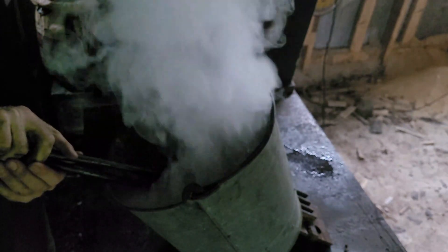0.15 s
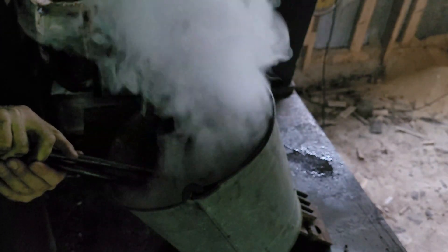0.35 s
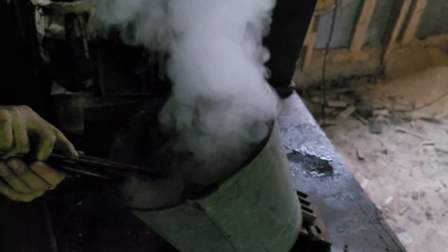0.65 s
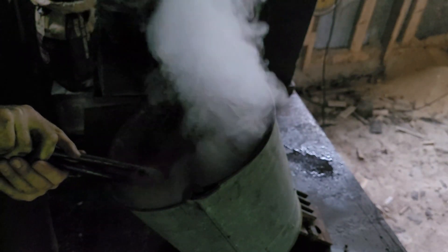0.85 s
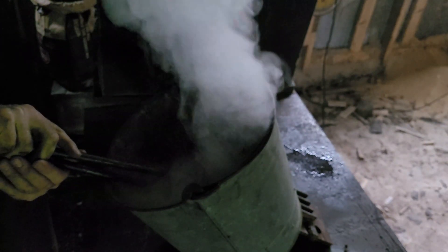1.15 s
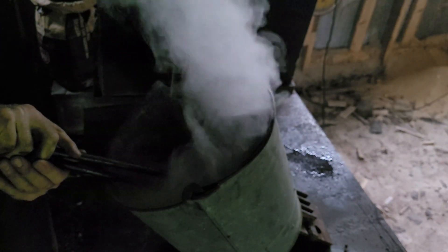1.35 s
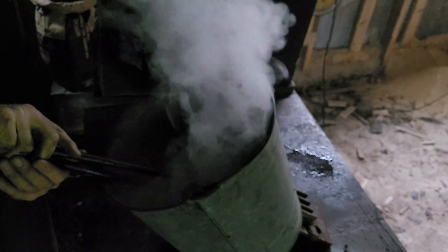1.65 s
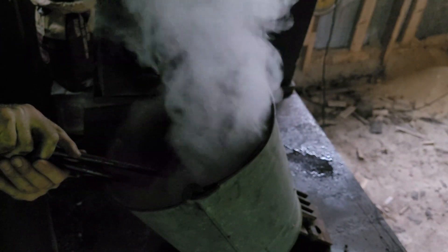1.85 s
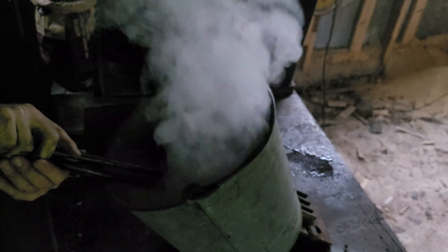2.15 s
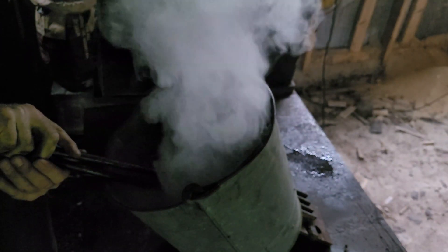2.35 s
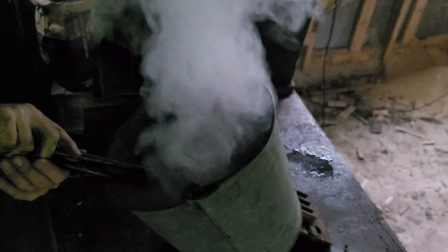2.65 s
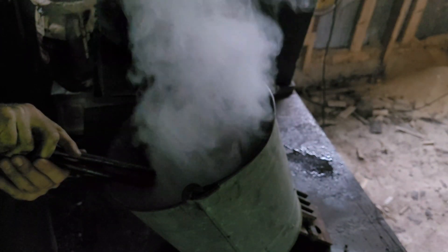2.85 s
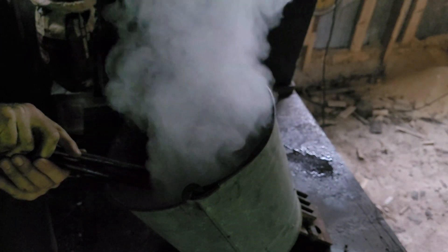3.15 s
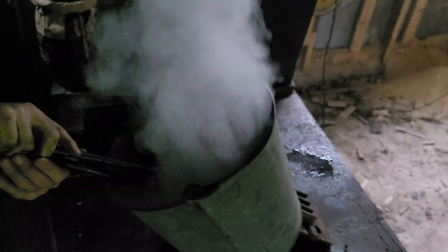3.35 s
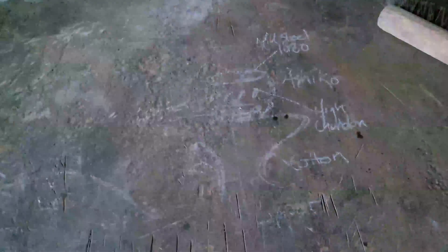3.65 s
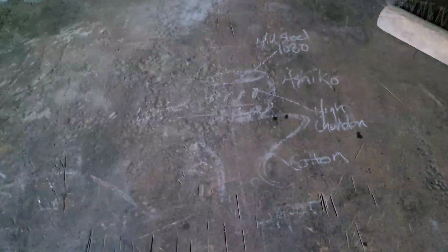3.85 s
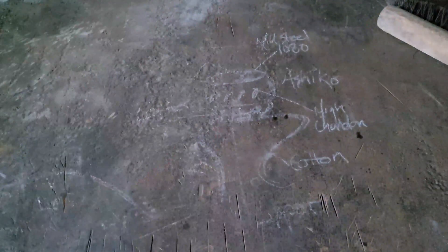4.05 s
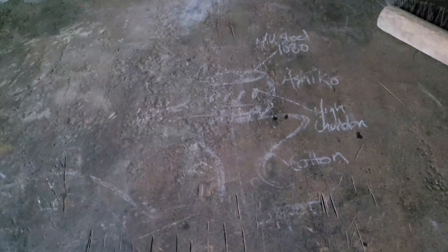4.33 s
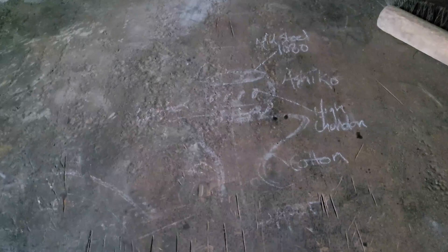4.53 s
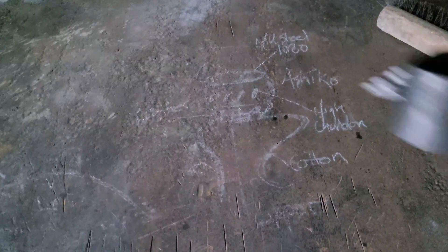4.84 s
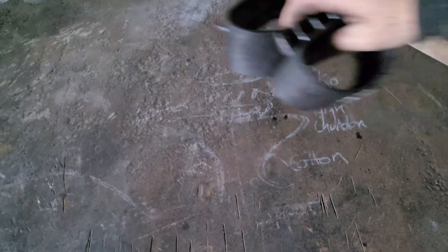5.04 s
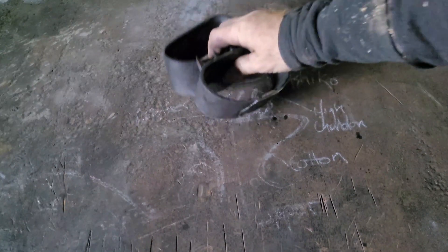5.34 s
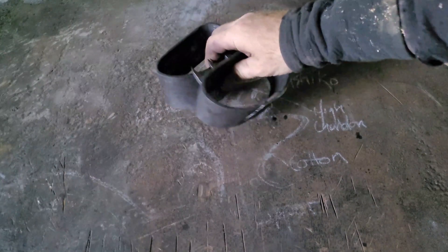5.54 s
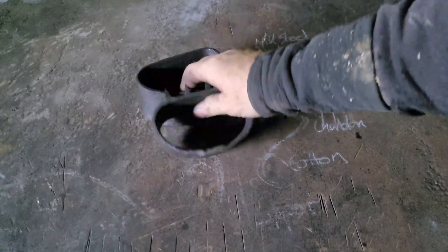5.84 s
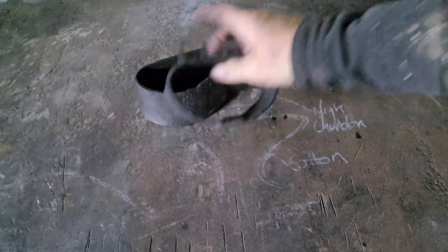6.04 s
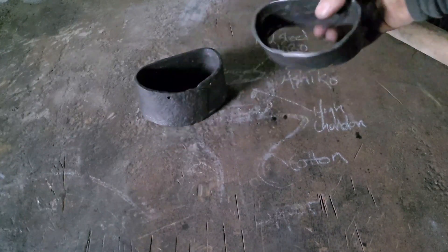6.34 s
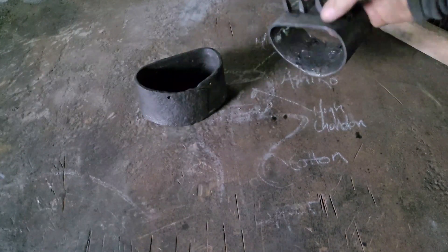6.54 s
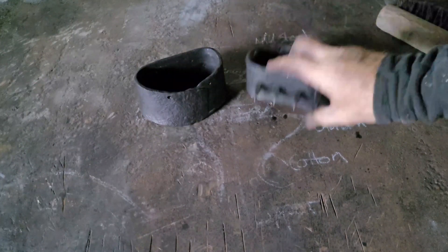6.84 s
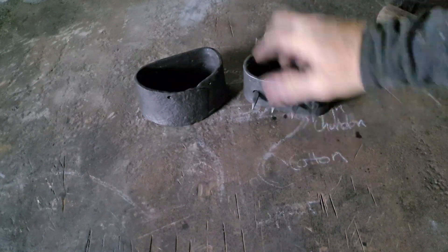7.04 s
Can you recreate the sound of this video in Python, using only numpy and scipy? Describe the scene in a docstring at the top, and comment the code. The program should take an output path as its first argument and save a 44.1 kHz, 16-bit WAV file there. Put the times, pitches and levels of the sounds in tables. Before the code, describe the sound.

Oil crackles and fizzes around hot metal, with hollow bucket resonance and snapping spits slightly left of centre. After a hard cut, near quiet: faint mains ticking, hiss and a thin rising whine. Light metallic clinks and a brief scrape follow, then heavy short-ringing knocks of bands on a bench, a pause, and a final hard set-down. Close stereo microphones, small dry shop reverberation.

```python
"""Hot steel in oil, then bands on a bench

Hot steel sizzles in a bucket of oil: dense random bursts make the seethe, pitched pops and noisy spits
stand out of it. After a cut, two steel bands clink, scrape and are set down on a wooden bench: knocks and
rubs drive the ringing modes of all three, and feedback delays give the shop's reverberation.
Filtered noise makes the air that rocks the microphones; a ticking mains buzz, steady tones,
a thin gliding whine and hiss lie under everything.
"""
import sys
import numpy as np
from scipy import signal
from scipy.fft import rfft, irfft, next_fast_len
from scipy.io import wavfile
from scipy.ndimage import uniform_filter1d

SR = 44100
rng = np.random.default_rng(int(sys.argv[2]) if len(sys.argv) > 2 else 0)


def transcribe(u):
    """Save the signal u as a 16-bit wav file named by the first command-line argument.

    u: samples, shape (n,) or (channels, n), limited to [-1, 1]; the rate is SR.
    q: integer samples, one column per channel.
    """
    v = np.clip(np.atleast_2d(u).T, -1, 1)
    q = np.round(v * 32767).astype(np.int16)
    wavfile.write(sys.argv[1], SR, q)


N = 316969
T = np.arange(N) / SR   # time in seconds

# Loudness of the seething oil. Each row: time in seconds, level in dB.
SEETHE_LEVEL = [(0, -45), (1.25, -43.5), (1.8, -44.5), (2.3, -43), (2.95, -45), (3.39, -44.5),
                (3.52, -44.5), (3.58, -55)]
# Colour of the seething. Each row: frequency in Hz, relative level in dB per Hz.
SEETHE_COLOUR = [(120, -42), (200, -20), (403, -1), (630, -8.5), (738, -7), (1060, -12), (1350, -7.5),
                 (2010, -8.5), (3300, -9), (5410, -14), (5850, -18.5), (9000, -27), (11700, -47),
                 (19800, -120)]
# Hollow notes of the bucket. Each row: frequency in Hz, width in Hz, level against the seethe in dB.
BUCKET_NOTES = [(1418, 35, -15.5), (312, 75, -11.5), (428, 41, -25.5)]
# Big bubbles. Each row: start in seconds, level in dB, pitch in Hz.
BIG_BUBBLES = [(0.1102, -31.5, 4840), (0.2448, -34.5, 3030), (0.3621, -37, 3250), (0.5172, -36, 2870),
               (0.7731, -32, 3500), (0.846, -33, 3230), (1.015, -37, 1690), (1.257, -40, 1390),
               (1.4506, -42, 1310), (2.1625, -39, 3630), (2.348, -35.5, 2470), (2.9841, -40, 3260),
               (3.5029, -40, 2550)]
# Oil spits at set times, most of them loud. Each row: start in seconds, peak level before panning in dB,
# centre in Hz.
TIMED_SPITS = [(0.112, -18, 11600), (0.2447, -17.5, 14100), (0.3626, -20, 9250), (0.4105, -25, 9130),
               (0.463, -21.5, 9360), (0.5906, -30, 13600), (0.6636, -24, 13200), (0.7607, -16, 13100),
               (0.8005, -16, 13800), (0.8789, -25.5, 14300), (1.1833, -25, 7800), (1.2513, -22, 9810),
               (1.3713, -21, 8340), (1.454, -28, 13300), (1.5683, -27.5, 14300), (1.951, -26, 14200),
               (2.2041, -21.5, 14000), (2.4284, -28, 6440), (2.7625, -18, 14000), (2.8953, -45, 13100),
               (3.0729, -28, 6650), (3.1715, -27, 14400), (3.3737, -23, 11800)]
# Bands knocked. Each row: start in seconds, first band, second band and bench level in dB,
# hardness in dB per octave, left minus right in dB.
BAND_KNOCKS = [(4.473, -50, -51, -42, 3, 3), (4.541, -35.5, -50, -50, 3.5, -1),
               (4.693, -33, -79, -65, 1, -16), (4.706, -21.5, -47, -34.5, 0.5, -19),
               (4.72, -20.5, -57, -47, 4, -14), (4.739, -27.5, -45, -50, 11, -19),
               (4.754, -45, -55, -50, 2, 1), (5.197, -42, -61, -68, 10, -1), (5.279, -61, -67, -64, -5, -3),
               (5.442, -36, -60, -64, 4, 1), (5.704, -51, -57, -58, 3, 5),
               (5.735, -34, -10.5, -23.5, -6.5, -2.5), (5.795, -18, -8.5, -5, 1, -5.5),
               (5.868, -24.5, -21, -21, -5, -1), (6.026, -59, -50, -61, -2, 0),
               (6.473, -49, -34.5, -41, -4.5, 1), (6.534, -41, -32, -56, 13, 0),
               (6.778, -10.5, -18, -25.5, -6.5, 1.5), (6.86, -13, -33, -15, 5.5, 8.5),
               (6.875, -22, -32, -7, 8.5, 12), (6.895, -13.5, -14.5, -18.5, -1, 5)]
# Bands rubbed. Each row: start in seconds, length in seconds, first band, second band and bench level in dB,
# hardness in dB per octave.
BAND_SCRAPES = [(4.67, 0.059, -46, -40, -52, 10), (5.428, 0.091, -48.5, -70, -64, 1),
                (6.464, .165, -60.5, -52.5, -54, -0.5)]
# Ringing modes of the two bands, left free, and of the bench.
# Each row: frequency in Hz, relative level in dB, 60 dB decay time in seconds.
FIRST_BAND_MODES = [(1523, 7, 0.21), (1700, -1, 0.04), (1850, -8, 0.06), (2046, -2, 0.06), (2345, -5, 0.08),
                    (2570, 1, 0.07), (2760, -10, 0.12), (3200, -10, 0.06), (3550, 0, 0.04), (3725, 2, 0.05),
                    (3960, -3, 0.05), (4350, -10, 0.05), (4975, 0, 0.055), (6970, -17, 0.02)]
SECOND_BAND_MODES = [(1135, -3, 0.099), (1308, 1, 0.057), (1374, 4, 0.048), (1440, -9, .15),
                     (2030, -1.5, 0.071), (2151, 4.5, 0.049), (2340, -33, 0.15), (2420, -2.5, 0.1),
                     (2770, -14, 0.076), (3460, -37, 0.043), (4140, -9, 0.069), (5500, -39, 0.11)]
BENCH_MODES = [(125, -31, 0.16), (268.7, -18.5, 0.22), (328.5, -9.5, 0.11), (417, -42, 0.17),
               (512, 0.5, 0.069), (611, -5.5, 0.077), (657, -11, 0.21), (769, 1.5, 0.11),
               (821, -6.5, 0.052), (930, 5, 0.04)]
# Slow air pressure. Each row: time in seconds, level in dB.
SWELL_LEVEL = [(0, -35), (1.2, -35), (1.35, -18), (1.7, -17), (1.9, -22), (2.4, -18), (2.55, -30),
               (3.5, -29), (4.3, -33), (4.6, -28), (5.2, -35), (5.75, -33), (6.05, -23), (6.25, -30),
               (6.45, -24), (7, -24), (7.19, -29)]
# Puffs of air on the microphones. Each row: centre in seconds, level in dB.
AIR_PUFFS = [(1.44, -29), (1.55, -29.5), (1.74, -28), (2.1, -32), (2.381, -17), (2.65, -31), (2.9, -39),
             (3.14, -36.5), (4.12, -61), (4.46, -31.5), (4.98, -30), (5.16, -40), (6.12, -24), (7.19, -36)]
# Steady tones. Each row: frequency in Hz, rms level in dB.
STEADY_TONES = [(60.014, -52.5), (180.04, -69), (7500, -70.5), (9990, -69.5)]
# Wandering whine before the cut. Each row: time in seconds, pitch in Hz, level in dB.
WHINE_GLIDE = [(0, 5560, -58), (.4, 5340, -58), (.95, 5500, -58), (1.3, 5285, -58), (1.7, 5120, -59),
               (2.1, 5070, -60), (2.6, 5050, -63), (2.9, 5050, -80)]
# What the climbing whine still lacks, dying away. Each row: gap in Hz, time constant in seconds.
WHINE_RISE_GAPS = [(500, .07), (2170, .5)]
# The whine and two lines below it, a buzz rate apart. Each entry: level against the whine's gain in dB.
WHINE_LINES = [-1, -3.5, -5]
# Colour of the hiss. Each row: frequency in Hz, relative level in dB per Hz.
HISS_COLOUR = [(35, 1), (65, 12), (125, 7.5), (250, 4.5), (510, 1.5), (1000, -3.5), (2000, -5.5),
               (4000, -8.5), (8000, -10.5), (15500, -12.5)]

FIZZ_DB, FIZZ_FADE_DB_PER_S = -47.5, 1.5   # the treble fizz thins as the steel cools
SMALL_SPITS, SMALL_SPIT_HZ = 18, (6200, 14400)   # at random moments, centred in this range
SMALL_SPIT_DB, SMALL_SPIT_RANGE_DB = -36, 9   # middle level, and the most above or below it
SPIT_PAN_DB, SPIT_PAN_SPREAD_DB = 2.5, 8.5   # left minus right
RUB_ATTACK_S, RUB_RELEASE_S, RUB_EDGE_DB = 0.034, 0.043, -33   # a rub swells from and sinks to its edge level
MODE_LAG_CYCLES = (0.15, 0.3)   # each mode reaches one microphone this much after the other
SET_DOWN_S = 5.72   # until then the hand grips both bands
GRIP_SHARE = 0.45   # of the free ring time that the grip leaves
KNOCK_MODE_DB, RUB_MODE_DB, CRACK_DB = -11.5, -1.5, -14   # knock to mode, rub to mode, knock to crack
KNOCK_SCATTER_DB = 1.8   # random spread of each knock in each mode
SHOP_T60_S, SHOP_WALL_CUT_HZ, SHOP_DB = 0.28, 7800, -13
RUMBLE_DB = -23.5   # added to the swell level
LUMPS_DB, LUMPS_PER_S = -0.5, 5.6   # depth and rate of the rumble's lumps
PUFF_HALF_WIDTH_S = 0.03
BUZZ_HZ, BUZZ_START_S, BUZZ_DB = 120.028, 0.00565, -27.5   # ticks per second, first tick, tick level
RISE_START_S, RISE_TOP_HZ = 3.62, 5785   # after the cut the whine climbs and settles
RISE_DB, FADE_IN_DB, FADE_IN_S = -57, -10, 0.12   # settled level, starting deficit, time constant
THROB_LAG = 0.22   # share of a buzz cycle after the tick
HISS_DB = -50
TREBLE_STEP_HZ, TOP_CUT_HZ = 14900, 16345


def quench():
    """Vapour bubbles burst all over the oil: a wide seething, short pops, hollow bucket notes, treble fizz."""
    seethe_db, on = in_time(SEETHE_LEVEL)
    shared, *sides = grains(9000, spread_db=3.5, channels=3)
    bursts = 0.5 * shared + np.array(sides)
    seethe = coloured(bursts, SEETHE_COLOUR)
    for hz, width_hz, db in BUCKET_NOTES:
        seethe = seethe + from_db(db) * rms_one(ring(bursts, hz, 2.4 / width_hz))

    # each pop is dealt one of twelve pitches
    births = grains(220, spread_db=2.5)
    pitch_index = rng.integers(0, 12, N)
    pops = np.zeros((2, N))
    for k, hz in enumerate(np.geomspace(1000, 5200, 12)):
        pops += ring(births * (pitch_index == k), hz, 23.0 / hz)
    seethe = close_pair(seethe + from_db(-11) * rms_one(pops), alike_hz=525)

    # the fizz is a smooth hiss with sparse crackles on top
    crackles = rms_one(grains(400 * from_db(4 * drift(15)), spread_db=5.0))
    fizz = rng.standard_normal((2, N)) + 1.2 * crackles
    fizz = coloured(fizz, [(3500, -8), (6500, 1), (11000, 2), (14000, 7), (16000, 2)])
    fizz_gain = from_db(FIZZ_DB - FIZZ_FADE_DB_PER_S * T)

    flicker = from_db(1.6 * drift(14))
    mix = from_db(seethe_db) * flicker * seethe + fizz_gain * fizz
    return on * mix * from_db([[1.1], [-1.1]])   # slightly to the left


def big_pops():
    """Each big bubble rings briefly at its own pitch."""
    out = np.zeros(N)
    for start, db, hz in BIG_BUBBLES:
        click = np.zeros(2000)
        click[0] = from_db(db)
        out[round(start * SR):][:2000] += ring(click, hz, 60.0 / hz)
    return out * from_db([[1.5], [-1.5]])


def spits():
    """Each spit is a noise snap of about a millisecond with a weaker, longer spray behind it."""
    length = 900
    t = np.arange(length) / SR
    envelope = np.exp(-t / 0.00044) + 0.2 * np.exp(-t / 0.008)

    when, size, pitch = rng.random((SMALL_SPITS, 3)).T
    small_s = when * SEETHE_LEVEL[-2][0]   # none once the seethe starts its final drop
    small_db = SMALL_SPIT_DB + SMALL_SPIT_RANGE_DB * (2 * size - 1)
    small_hz = np.interp(pitch, [0, 1], SMALL_SPIT_HZ)

    out = np.zeros((2, N + length))
    for start, db, hz in [*TIMED_SPITS, *zip(small_s, small_db, small_hz)]:
        noise = rng.standard_normal((2, length))
        pan = rng.normal(SPIT_PAN_DB, SPIT_PAN_SPREAD_DB)
        band = signal.butter(1, [0.55 * hz, min(2.16 * hz, 0.45 * SR)], "band", fs=SR)
        puff = signal.lfilter(*band, noise * envelope)
        gain = from_db(db + np.array([[pan], [-pan]]) / 2)
        at = round(start * SR)
        out[:, at:at + length] += puff / np.abs(puff).max() * gain
    return out[:, :N]


def bands():
    """Knocks are one main contact with a short chatter behind it, scrapes dense small contacts; both ring modes."""
    start, *blows_db, hard_db, pan = np.transpose(BAND_KNOCKS)
    at = (start * SR).astype(int)
    # every knock chatters: six further contacts, mostly weaker, follow within some ms
    lags_s = rng.exponential(0.012, (len(at), 6))
    chatter_at = at[:, None] + 1 + (lags_s * SR).astype(int)
    chatter = 0.6 * np.exp(-lags_s / 0.016)
    rubs = [(*levels, rub(begin, length)) for begin, length, *levels in BAND_SCRAPES]
    held = T < SET_DOWN_S

    out, crack = np.zeros((2, N)), np.zeros(N)
    for body, modes in enumerate([FIRST_BAND_MODES, SECOND_BAND_MODES, BENCH_MODES]):
        held_share = 1 if modes is BENCH_MODES else GRIP_SHARE
        for hz, mode_db, t60 in modes:
            octaves = np.log2(hz / 2000)   # a hard contact favours the high modes
            force = np.zeros((2, N))
            knock_db = blows_db[body] + mode_db + KNOCK_MODE_DB + hard_db * octaves
            knock_db = knock_db + KNOCK_SCATTER_DB * rng.standard_normal((2, len(at)))
            force[:, at] = from_db(knock_db) * from_db([pan / 2, -pan / 2]) * rng.choice([-1, 1])
            force[:, chatter_at] += force[:, at, None] * chatter * rng.standard_normal(chatter.shape)

            for *levels, rub_hard_db, stroke in rubs:
                busy = stroke > 0
                count = busy.sum()
                grit = rng.standard_normal((2, count)) * (rng.random(count) < 900 / SR)
                rub_db = levels[body] + mode_db + RUB_MODE_DB + rub_hard_db * octaves
                force[:, busy] += grit * stroke[busy] * from_db(rub_db)

            # contacts before the set-down ring in the grip, later ones freely
            left, right = ring(force * held, hz, t60 * held_share) + ring(force * ~held, hz, t60)
            lag_cycles = rng.uniform(*MODE_LAG_CYCLES) * rng.choice([-1, 1])
            out += [left, np.roll(right, round(lag_cycles * SR / hz))]
        crack[at] += from_db(blows_db[body] + hard_db + CRACK_DB)
    out = signal.sosfilt(signal.butter(2, 6300, fs=SR, output="sos"), out)   # no contact is perfectly sharp
    return out + contact_noise(crack, rubs)


def rub(start, length):
    """Gain of one stroke: attack, hold, release."""
    end = start + length
    db, on = in_time([(start, RUB_EDGE_DB), (start + RUB_ATTACK_S, 0),
                      (end, 0), (end + RUB_RELEASE_S, RUB_EDGE_DB)])
    return on * from_db(db)


def contact_noise(crack, rubs):
    """Each knock's crack is noise that dies within tens of ms; each rub adds broad grit."""
    crack = signal.lfilter([1], [1, -np.exp(-1 / (0.011 * SR))], crack + 1e-18)
    crack_noise = coloured(rng.standard_normal((2, N)), [(100, 2), (400, 14.5), (2500, 17.5), (5500, 0.5),
                                                         (8000, -14), (15000, -22)])
    # grit follows the first band's rub level
    grit = sum(stroke * from_db(first + 2 * hard_db - 1.5) for first, _, _, hard_db, stroke in rubs)
    sand = coloured(grains(3800, spread_db=5.0), [(200, 2), (1500, 1), (5000, 2), (8000, -4.5), (15000, -8)])
    return crack * crack_noise + grit * sand


def shop(x):
    """Room reverberation: eight feedback delays a side, duller on every round."""
    size = next_fast_len(N + SR)
    w = 2 * np.pi * np.arange(size // 2 + 1) / size
    dull = 1 / (1 + 1j * w * SR / (2 * np.pi * SHOP_WALL_CUT_HZ))
    spectrum = rfft(x, size)
    out = []
    for lags_s in rng.uniform(0.012, 0.04, (2, 8)):
        response = 0
        for k, lag in enumerate(lags_s):
            trip = from_db(-60 * lag / SHOP_T60_S) * dull * np.exp(-1j * w * round(lag * SR))
            response = response + (-1) ** k * trip / (1 - trip)   # endless rounds; every other delay inverted
        out.append(irfft(spectrum * response, size)[:N])
    return np.array(out)


def air():
    """Slow pressure swells and a lumpy rumble with single puffs, the same in both channels."""
    swell = coloured(rng.standard_normal(N), [(0.5, -20), (1.5, 0), (10, -2), (16, -16), (30, -36), (200, -110)])
    rumble = coloured(rng.standard_normal(N), [(10, -4.5), (18, 13), (40, -3.0), (100, -15.5), (200, -40),
                                               (600, -60), (1000, -100)])
    swell_db = in_time(SWELL_LEVEL)[0]
    rumble_gain = from_db(swell_db + RUMBLE_DB + LUMPS_DB * drift(LUMPS_PER_S))
    puffs = sum(from_db(db) * np.exp(-((T - s) / PUFF_HALF_WIDTH_S) ** 2) for s, db in AIR_PUFFS)
    return from_db(swell_db) * swell + (rumble_gain + puffs) * rumble


def mains():
    """A sharp tick twice per mains cycle, up and down in turn, steady tones, a throbbing whine, and hiss."""
    cycle = (T - BUZZ_START_S) * BUZZ_HZ
    ticks = np.diff(np.floor(cycle), prepend=-1.) * -(-1) ** np.floor(cycle)
    out = from_db(BUZZ_DB) * signal.lfilter([1, -1], [1, -0.7], ticks)
    for hz, db in STEADY_TONES:
        out += np.sqrt(2) * from_db(db) * np.sin(2 * np.pi * hz * T)
    # lines a buzz rate apart beat together, so the whine throbs with the ticks
    whine_hz, whine_gain = whine()
    whine_cycles = np.cumsum(whine_hz) / SR
    for k, db in enumerate(WHINE_LINES):
        out += whine_gain * from_db(db) * np.sin(2 * np.pi * (whine_cycles - k * (cycle - THROB_LAG)))
    return out + hiss()


def whine():
    """Pitch in Hz and gain of the thin whine: a wandering glide, then a climb that settles."""
    hz, db, on = in_time(WHINE_GLIDE)
    since = np.maximum(T - RISE_START_S, 0)
    rising_hz = RISE_TOP_HZ - sum(gap_hz * np.exp(-since / tau) for gap_hz, tau in WHINE_RISE_GAPS)
    rising_gain = from_db(RISE_DB + FADE_IN_DB * np.exp(-since / FADE_IN_S))
    return np.where(since > 0, rising_hz, hz), np.where(since > 0, rising_gain, on * from_db(db))


def hiss():
    """Steady coloured noise, nearly alike in both channels."""
    mid, side = rng.standard_normal((2, N))
    side = 0.082 * coloured(side, [(90, -11), (720, -1), (4100, -9), (7100, -25), (15500, -18)])
    return from_db(HISS_DB) * (coloured(mid, HISS_COLOUR) + side * [[1], [-1]])


def close_pair(x, alike_hz):
    """Two close microphones hear the lows alike: their difference is high-passed."""
    side = signal.sosfilt(signal.butter(2, alike_hz, "high", fs=SR, output="sos"), x[0] - x[1])
    return (x[0] + x[1] + side * [[1], [-1]]) / 2


def grains(per_s, spread_db, channels=2):
    """Random clicks of very uneven size and either sign."""
    size_db = spread_db * np.minimum(rng.exponential(1, (channels, N)), 5)
    sizes = from_db(size_db) * rng.choice([-1, 1], (channels, N))
    return sizes * (rng.random((channels, N)) < per_s / SR)


def ring(clicks, hz, t60):
    """A two-pole resonator: a unit click starts a decaying sine of starting height 1."""
    r, w = from_db(-60 / (t60 * SR)), 2 * np.pi * hz / SR
    return signal.lfilter([0, np.sin(w)], [1, -2 * r * np.cos(w), r * r], clicks + 1e-18)


def coloured(x, spectrum):
    """Give white input a spectrum of (Hz, dB per Hz) points; rms 1."""
    size = next_fast_len(N)
    hz = np.arange(1, size // 2 + 2) * SR / size
    point_hz, point_db = np.array(spectrum).T
    gain = from_db(np.interp(np.log(hz), np.log(point_hz), point_db))
    return rms_one(irfft(rfft(x, size) * gain, size)[..., :N])


def drift(rate):
    """Slow random wander of rms 1: noise at a fortieth of the sample rate, low-passed around rate in Hz."""
    r = np.exp(-80 * np.pi * rate / SR)
    noise = rng.standard_normal(N // 40 + 2002)
    slow = signal.lfilter([1], [1, -2 * r, r * r], noise)[2000:]   # skip the filter's start-up
    return np.interp(np.arange(N) / 40, np.arange(len(slow)), rms_one(slow))


def in_time(rows):
    """Columns of a curve table at every sample, and a gate that is 1 while the table lasts."""
    s, *columns = np.transpose(rows)
    gate = uniform_filter1d(1. * (T > s[0]) * (T < s[-1]), size=200)   # soft edges
    return [np.interp(T, s, c) for c in columns] + [gate]


def rms_one(x):
    """Scale to rms 1."""
    return x / np.sqrt(np.mean(x ** 2) + 1e-20)


def from_db(db):
    """Decibels to gain."""
    return 10 ** (np.asarray(db) / 20)


def scene():
    """All sources; the bands ring in the shop."""
    steel = bands()
    steel = close_pair(steel + from_db(SHOP_DB) * shop(steel[0] + steel[1]), alike_hz=215)
    return quench() + big_pops() + spits() + steel + air() + mains()


def record(dry):
    """Peaks are rounded, the treble falls away in a step, then the top is cut."""
    rounded = 0.9 * np.tanh(dry / 0.9)
    step = signal.sosfilt(signal.ellip(6, 0.5, 28, TREBLE_STEP_HZ, fs=SR, output="sos"), rounded)
    return signal.sosfilt(signal.cheby2(12, 60, TOP_CUT_HZ, fs=SR, output="sos"), step)


dry = scene()
out = record(dry)
transcribe(out)
```